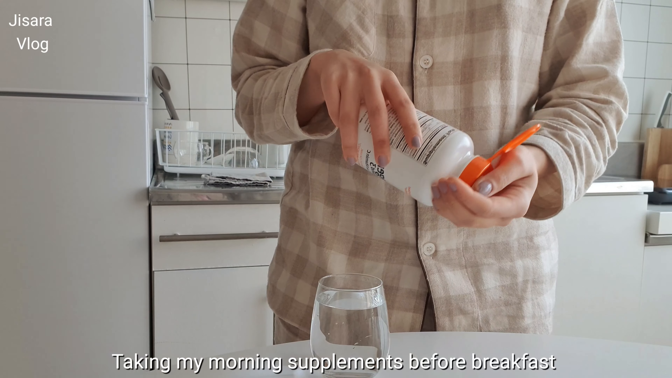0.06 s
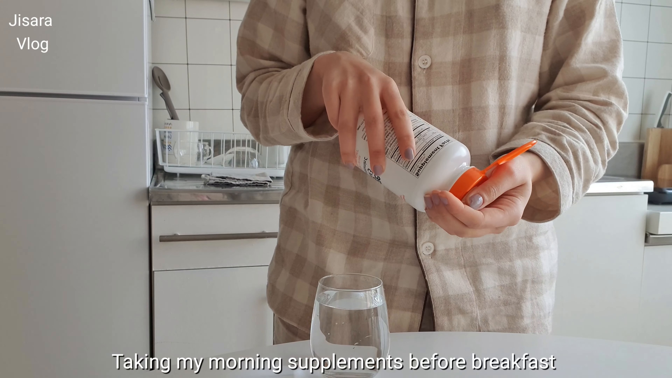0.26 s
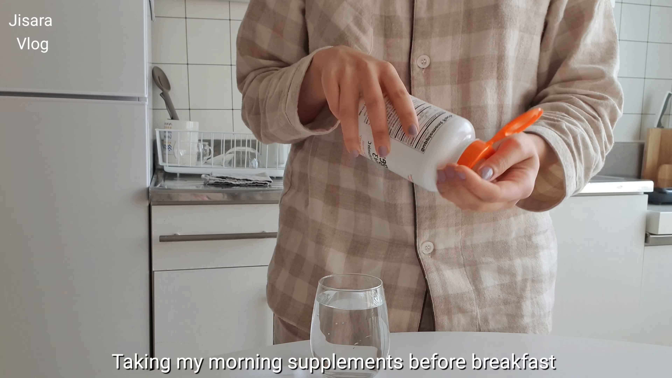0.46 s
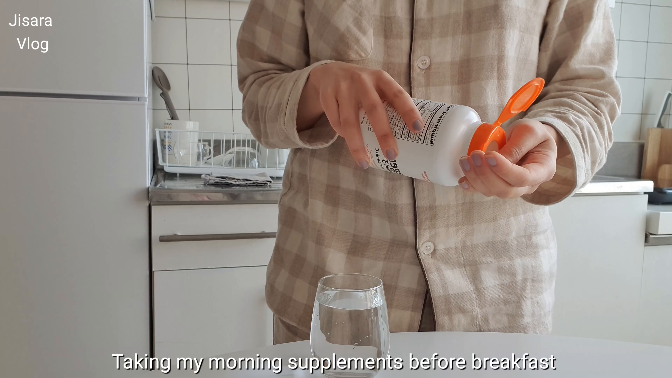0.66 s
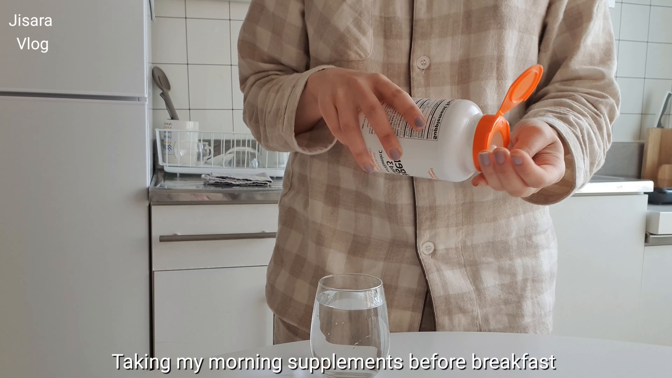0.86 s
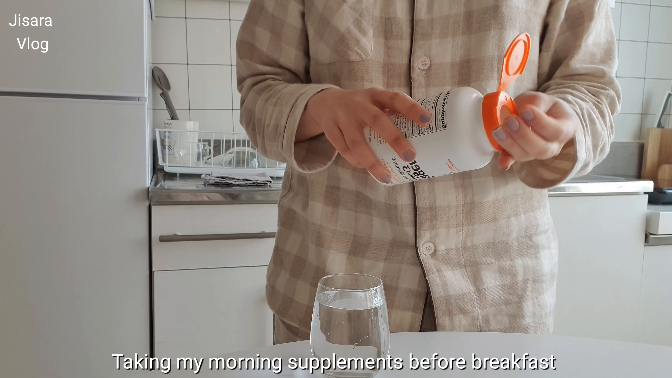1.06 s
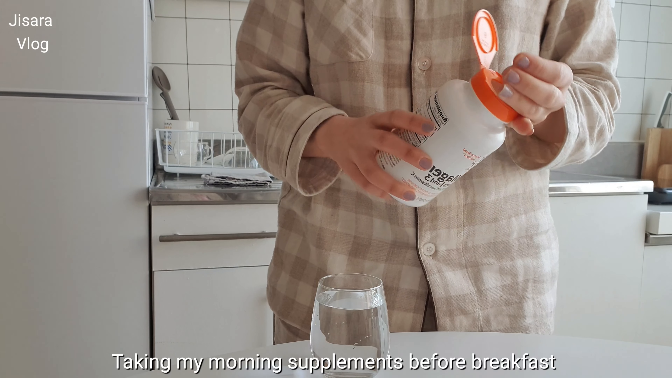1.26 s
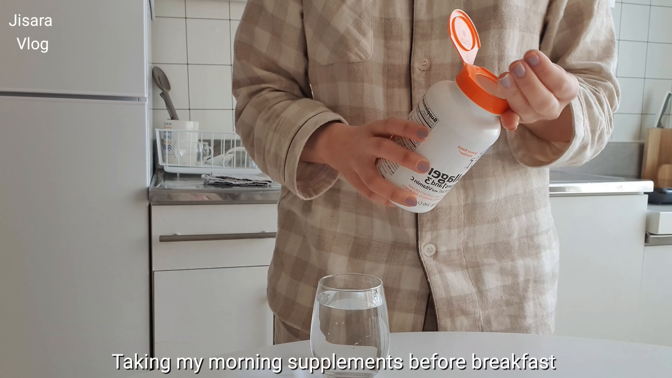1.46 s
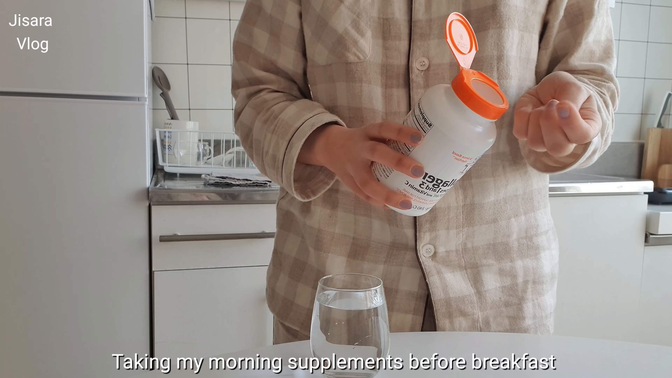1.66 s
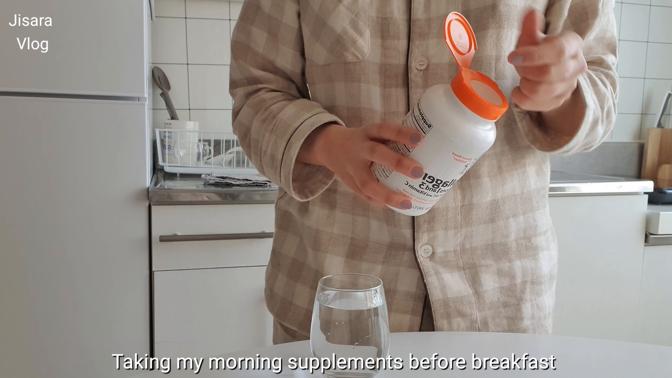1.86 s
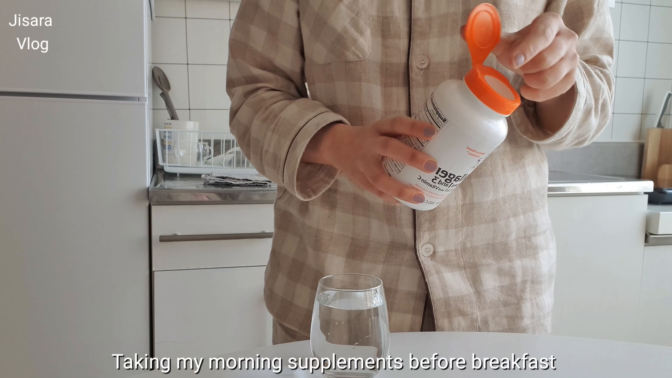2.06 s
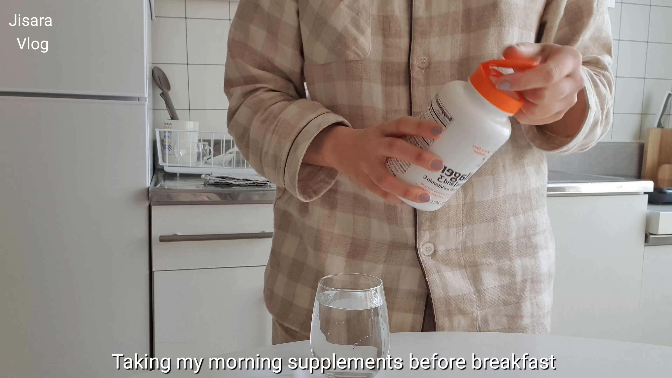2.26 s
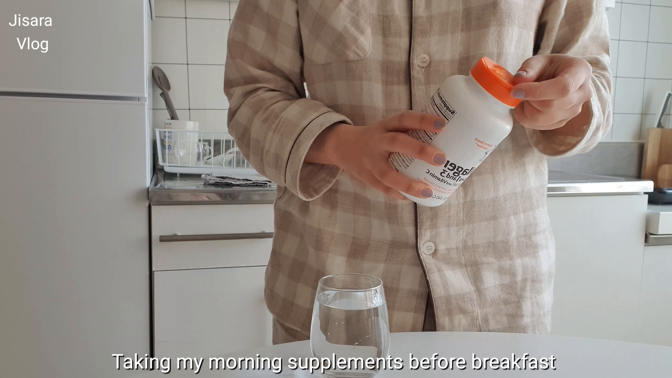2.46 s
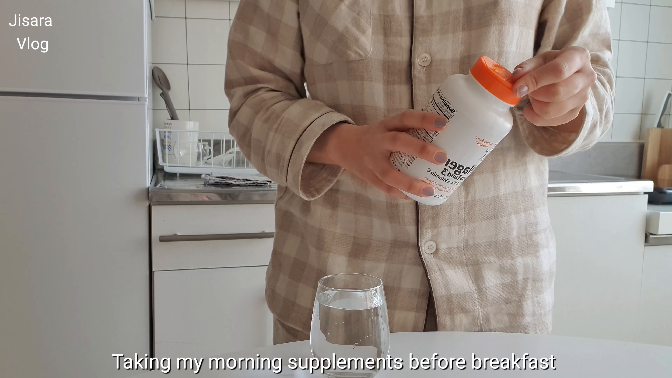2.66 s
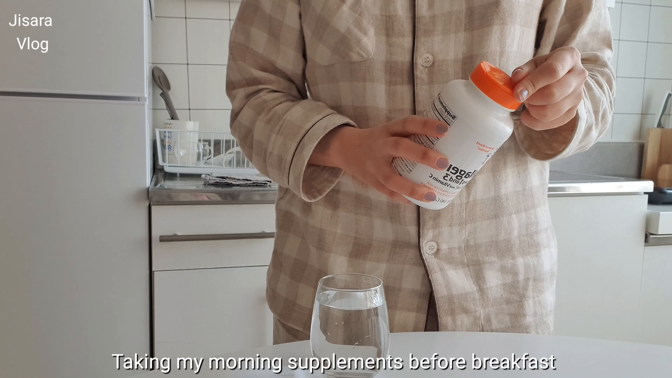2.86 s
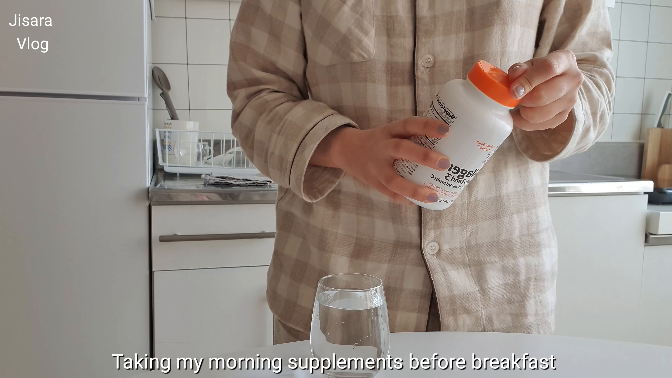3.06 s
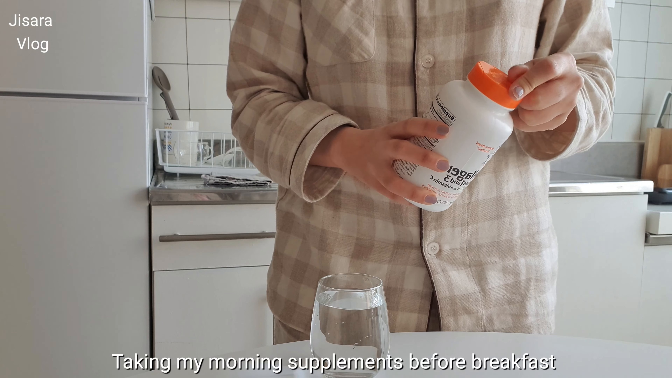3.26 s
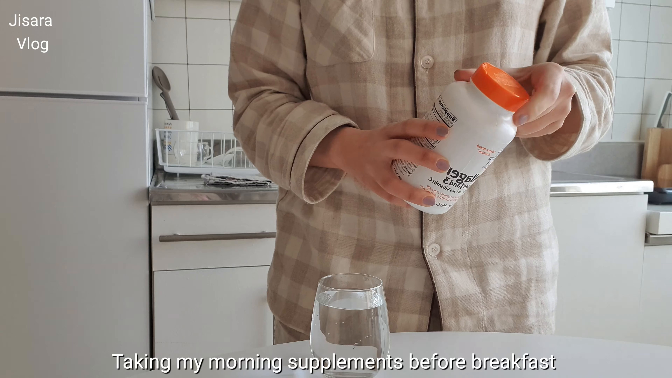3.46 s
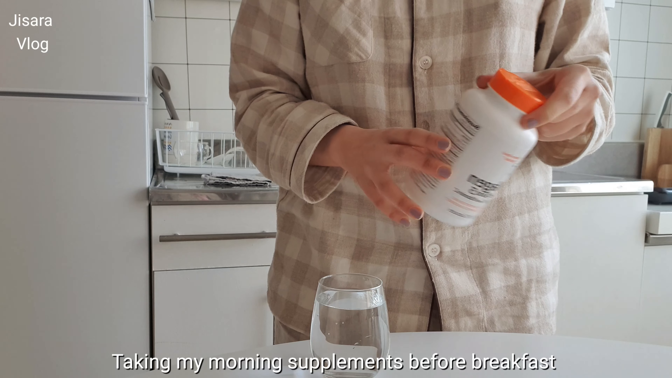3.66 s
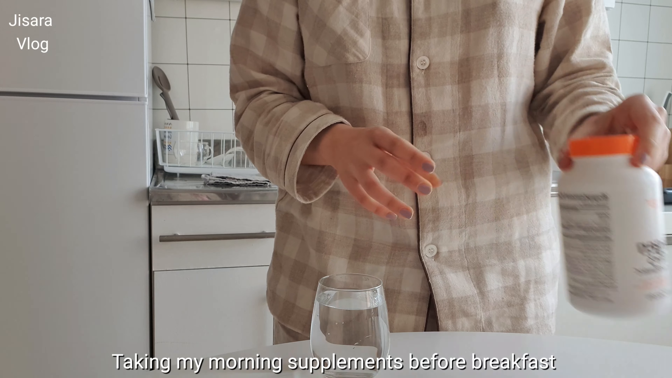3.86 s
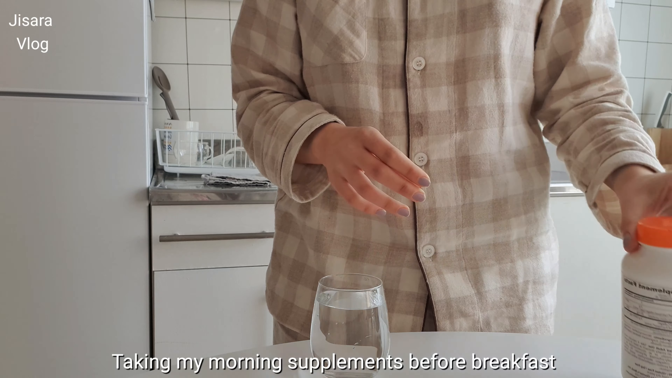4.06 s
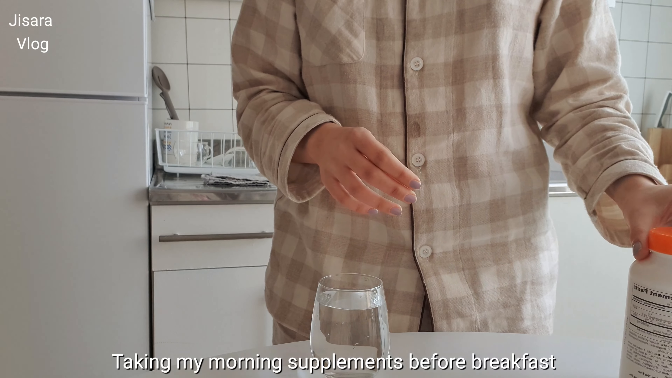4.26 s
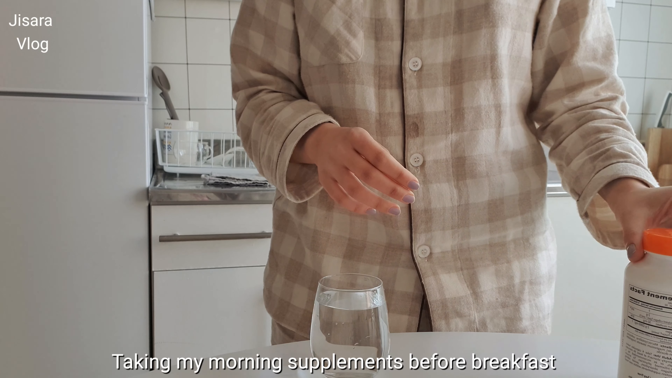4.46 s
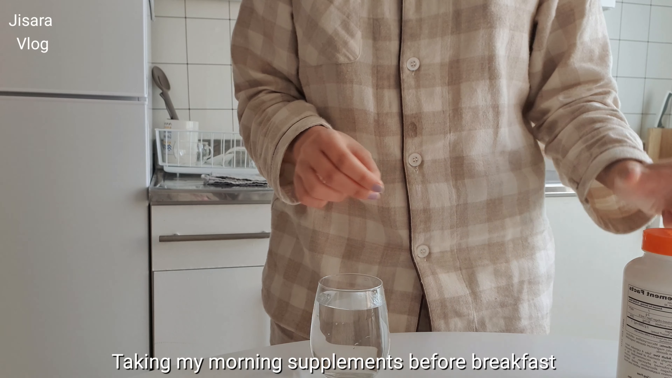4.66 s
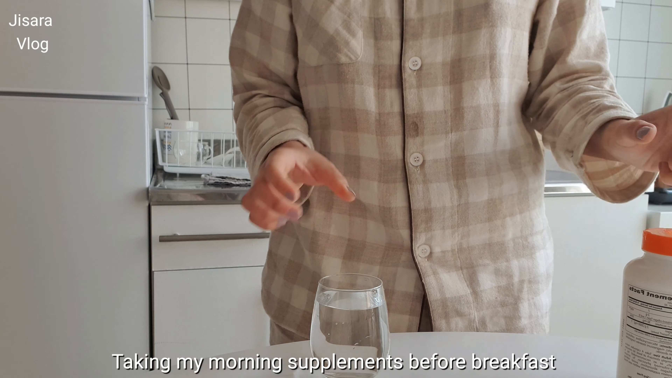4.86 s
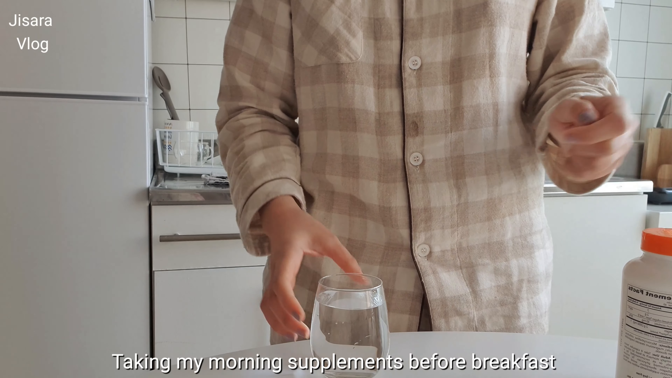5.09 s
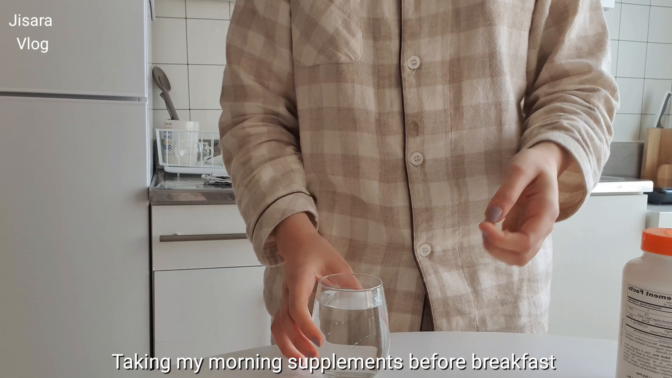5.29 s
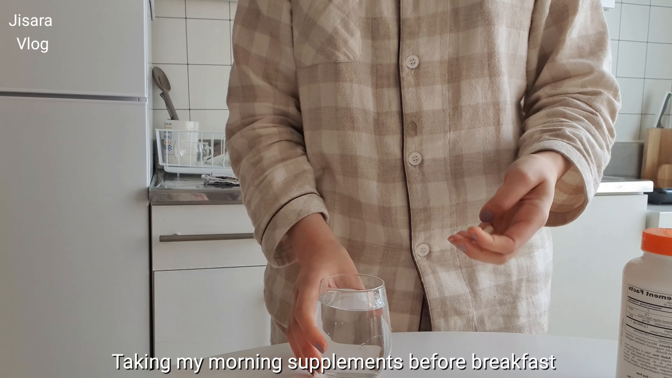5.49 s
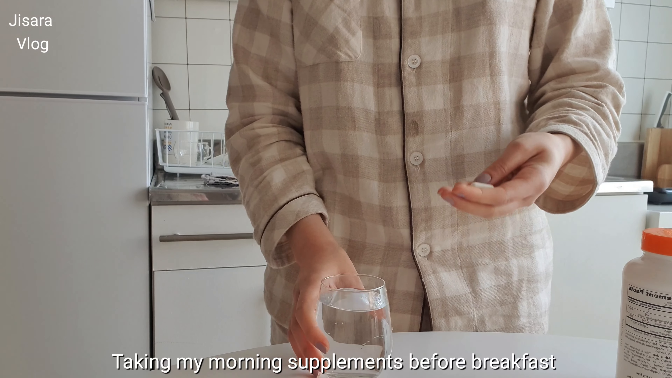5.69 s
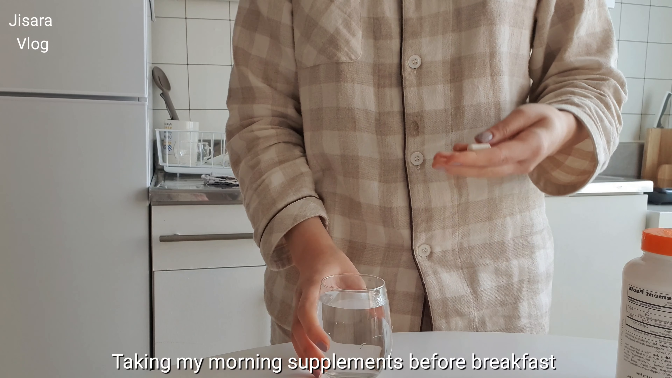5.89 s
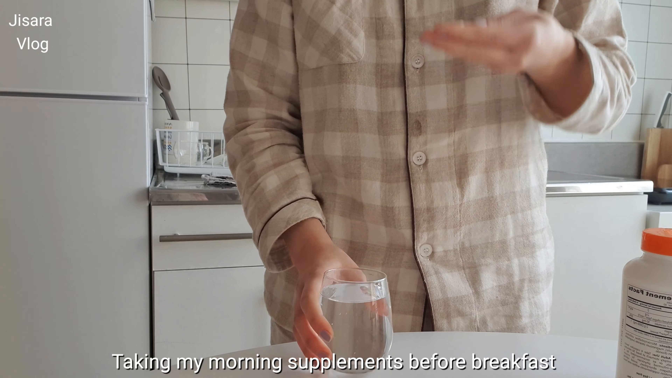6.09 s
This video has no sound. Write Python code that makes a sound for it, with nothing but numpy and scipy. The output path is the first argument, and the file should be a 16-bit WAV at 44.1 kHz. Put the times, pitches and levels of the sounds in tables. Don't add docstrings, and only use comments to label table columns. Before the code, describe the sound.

Pills rattle out of a plastic bottle in a small kitchen, the flip cap clicks and snaps hard, and the bottle lands on a table.

```python
import sys
import numpy as np
from scipy import signal
from scipy.fft import rfft, irfft
from scipy.io import wavfile

SR = 44100
rng = np.random.default_rng(int(sys.argv[2]) if len(sys.argv) > 2 else 0)


def output_pcm(signal):
    pcm = np.clip(np.atleast_2d(signal).T, -1, 1) * 32767
    wavfile.write(sys.argv[1], SR, np.round(pcm).astype(np.int16))


def invert_db(x):
    u = np.asarray(x, float) / 20
    return 10 ** u


N = 270333

# [t/s, strength level/dB, sharpness/dB (edge crack over wall ring),
# thump/dB (air cavity over strength), struck spot f/Hz]
POUR_KNOCKS = [(0.0231, -30.5, -1.5, -21, 4540), (0.0656, -34.5, -6, -4, 3550),
               (0.1344, -33, 28, -11, 3300), (0.1628, -34.5, 7, -26, 2900), (0.2061, -47, -20, 17.5, 3000),
               (0.2278, -32, -6, 10, 3060), (0.256, -31.5, -2, -25, 4400), (0.2636, -30, 18, -12, 3000),
               (0.2917, -29, 6, -5, 2480), (0.2985, -38, 3, -0.5, 2700), (0.3328, -54, 11, 22, 2700),
               (0.3686, -36, 9, -23, 2550), (0.3844, -51, -19, 12, 3000), (0.4197, -55, 13, -8, 4300),
               (0.53, -77.5, -10, 22.5, 3000)]
FALL_KNOCKS = [(1.2149, -59, 9.5, -24.5, 4640), (1.2376, -54.5, 8, -3.5, 3400),
               (1.3449, -57.5, -3.5, 14, 3000), (1.3861, -36.5, 12, -26.5, 3240),
               (1.4135, -54.5, 4, 7, 3510), (1.4557, -29, 17.5, -18, 3000),
               (1.4888, -31.5, -12.5, -8, 3010), (1.5136, -23.5, 1.3, -20, 3100),
               (1.5314, -51, 2, -19, 3030), (1.5555, -39, -16, 2.5, 2900), (1.5877, -38.5, 3, -2, 2900),
               (1.6208, -33, 2, -25, 3040), (1.6766, -43.5, 30, -4, 3600), (1.7333, -47.5, -24, -4, 3000)]
PRESS_KNOCKS = [
    (2.4225, -48, 6.5, -7.5, 2590),
    (2.4445, -49.5, 12.5, 5, 2686),
    (2.458, -55.5, 5, 19.5, 2600),
    (2.4749, -37, -17, -3, 2900),
    (2.4915, -56, -3, 19, 3400),
    (2.4972, -24, -4.5, 0.5, 3800),
    (2.5045, -34, -28, 5.2, 3800),
]
SNAP_KNOCKS = [
    (3.0876, -88, -1.5, -2.5, 2592),
    (3.1832, -39, -7, 9, 2700),
    (3.1841, -16, 3, -7, 2700),
]
CARRY_KNOCKS = [
    (3.8027, -67, 11, 7.5, 3200),
    (3.8507, -52, 9, 9, 3100),
    (3.8745, -43, -4.5, -5, 3000),
    (3.9015, -37, 18, -13, 3700),
    (3.9155, -30, -29, -19, 4300),
    (3.9579, -39.5, 29, -3.5, 3400),
    (3.9956, -43.5, 17, 7, 3700),
]
TABLE_KNOCKS = [
    (4.2936, -34.5, -1, 4.9, 3300),
    (4.325, -39.5, -8, 6.2, 2400),
    (4.5322, -61.5, -23, 3.5, 3600),
]
SETTLING_KNOCKS = [
    (.593, -51.5, -6, -18, 3500),
    (1.7575, -61.5, -7, 13, 4070),
    (4.152, -77, -4, -18, 2950),
    (4.2319, -55, -3.5, -32, 2980),
    (4.7, -66, -17, -18, 3000),
]

# [t/s, level/dB]
POUR_PATTER = [(0.0, -52.5), (0.152, -49), (0.228, -49), (0.356, -54.5), (0.412, -77.5), (0.5, -95)]
FALL_PATTER = [(1.22, -76), (1.238, -61.5), (1.33, -58), (1.42, -46), (1.47, -51.5), (1.52, -43.5),
               (1.6, -58.5), (1.72, -65), (1.8, -77)]
PRESS_PATTER = [(2.42, -67), (2.435, -54.5), (2.45, -56), (2.47, -57.5), (2.49, -61.5)]
CARRY_PATTER = [(3.8, -87), (3.844, -59.5), (3.886, -48.5), (3.914, -39), (3.93, -47.5), (4.002, -59.5),
                (4.04, -66)]
FINGER_RUB = [(3.6, -87), (3.616, -77), (3.652, -87), (3.674, -75), (3.73, -85)]
# [t/s, level/dB]
FINGER_TICKS = [
    (1.415, -56),
    (1.838, -70),
    (3.606, -70),
    (3.6194, -65),
    (4.5326, -59.5),
]

# [wall/dB, cavity/dB, crack/dB, tick/dB]
POUR_COLOUR = (3, -2, -11.5, -24.5)
FALL_COLOUR = (-2.9, -1, -11, -21)
PRESS_COLOUR = (4, 11.5, -6, -10.5)
CARRY_COLOUR = (-0.4, -11, -11.5, -24.5)
RUB_COLOUR = (-9.5, -16, -16, -1.5)

# [f/Hz, bandwidth/Hz, level/dB]
BOTTLE_TIPPED = [(272, 26, -14.5), (304.8, 6.1, -11.5), (432, 320, -4), (1058, 107, -1.5), (1350, 650, -5),
                 (1530, 134, -7), (1773, 81, -13.5), (2400, 260, -5), (2900, 205, -5.5), (4320, 1220, 5),
                 (6300, 1300, -1), (8800, 2800, 11.5), (12600, 2300, -5)]
BOTTLE_OPEN = [(340, 22, -8.5), (357, 65, -5), (540, 110, -7.5), (1144, 99, -1), (1491, 60, -4.5),
               (1769, 90, -4.5), (900, 470, -7.5), (2926, 395, -3), (3670, 710, -8.5), (4600, 734, -3),
               (5450, 4000, -6), (9250, 2000, 6.5), (12500, 3000, -8)]
CAP_LOOSE = [(141, 39, -12), (344, 33, 0), (1200, 240, -22), (1620, 120, -1), (1860, 330, -9.5),
             (2590, 560, 2.5), (3600, 1100, -2.5), (5900, 860, -2.5), (8960, 1800, 8), (12400, 3500, -0.5)]
CAP_SHUT = [(109, 95, -14), (187, 230, -9.5), (342, 240, 6.5), (524.5, 150, 2.5), (706, 120, -9),
            (1137, 225, -2.5), (1631, 330, 1.5), (2732, 380, -2), (3800, 790, -4), (5070, 890, 6),
            (6760, 1400, 11.5), (9380, 2200, 13.5), (12800, 4800, -2.5), (15500, 1700, -6.5)]
BOTTLE_SHUT = [(365, 180, -9.5), (580, 280, -1), (1170, 206, 3), (1640, 300, -2), (2900, 200, 0.5),
               (3640, 270, -2.5), (4380, 460, 2), (5700, 2300, -2), (8930, 1200, 6), (10600, 5400, -9)]
TABLE_MODES = [(97.7, 10.4, 2.5), (174.5, 16, 0.5), (250, 46, 2), (291.5, 37, -1), (455, 27.4, -4.5),
               (570, 54, -15), (632, 49, -8), (854, 180, 2.5), (1360, 740, 8.5), (2400, 760, 12.5),
               (3300, 400, 0), (5250, 2800, 6.5), (9500, 2600, 8)]
FAR_WALL = [(373, 24.5, -6.5), (1090, 136, -3), (1520, 430, -13), (2700, 150, -2.5), (3000, 280, -4),
            (4300, 970, 2), (6300, 1200, 7), (9100, 1900, 8.5)]
FAMILY_EDGES_HZ = (750, 2150, 7000)
# [wall/dB, cavity/dB, crack/dB, tick/dB]
KNOCK_GAIN_DB = (-2.5, 0.69, -1.8, -0.3)
PATTER_GAIN_DB = (-7.5, -4, -1.5, -6.5)

# [f/Hz, T60/s]
ROOM_T60 = [(80, 0.38), (160, 0.35), (400, 0.36), (1000, 0.48), (2500, 0.38), (5000, 0.39), (9000, 0.31),
            (14000, 0.25)]
# [f/Hz, level/dB]
ROOM_LEVEL = [(45, -44.5), (90, -33.5), (250, -29), (1000, -27.5), (3000, -31), (8000, -34), (14000, -30)]
# [delay t/s, level/dB]
ECHOES = [(.0072, -15), (0.019, -17.5), (0.0248, -20), (.027, -23)]
# [f/Hz, likeness/1]
ROOM_LIKENESS = [(60, 1), (180, 0.96), (550, 0.76), (1650, 0.041), (4970, 0.1), (15000, 0.25)]
# [f/Hz, level/dB per Hz]
AIR_SPECTRUM = [(12, -50), (20, -19.5), (27, -15.5), (43, -11.5), (63, -5), (86, -9.5), (156, -18.5),
                (185, -27), (266, -25), (298, -30.5), (1000, -39), (3550, -44.5), (6590, -52.5),
                (13700, -51), (16700, -58.5)]
# [f/Hz, likeness/1]
AIR_LIKENESS = [(60, 0.61), (180, 0.74), (550, 0.26), (1650, -0.8), (4970, -0.02), (15000, -0.62)]
# [f/Hz, rms level/dB]
HUM_LINES = [
    (30.25, -80.5),
    (48.35, -78),
    (60.5, -68),
]
# [start t/s, end t/s]
DROPOUT_S = (4.8058, 4.8194)

PATTER_PER_S = 1800
CRACK_FOCUS_DB = 13
CONTACT_WIDTH_HZ = 1100
CHATTER_S, CHATTER_LOSS_DB = .0006, 7.5
ECHO_CUT_HZ, CUTOFF_HZ = 4500, 17000
AIR_DB = -67.5
BEAT_PER_S, BEAT_PEAK_S = 1.75, .474
SECOND_MOTOR_DB = -4
HUM_HZ, HUM_WIDTH_HZ, HUM_NOISE_DB = 60.17, 3, -75.5


def pour_out():
    hits = knocks(POUR_KNOCKS, BOTTLE_TIPPED, scatter_db=2.5, tick_db=-15.5)
    return hits + patter(POUR_PATTER, BOTTLE_TIPPED, POUR_COLOUR, spread_db=3.0)


def fall_back():
    hits = knocks(FALL_KNOCKS, BOTTLE_OPEN, scatter_db=-2.5, tick_db=-19)
    return hits + patter(FALL_PATTER, BOTTLE_OPEN, FALL_COLOUR, spread_db=4.5)


def press_cap():
    clicks = knocks(PRESS_KNOCKS, CAP_LOOSE, scatter_db=0.0, tick_db=-8.5)
    return clicks + patter(PRESS_PATTER, CAP_LOOSE, PRESS_COLOUR, spread_db=1.0)


def snap_cap():
    return knocks(SNAP_KNOCKS, CAP_SHUT, scatter_db=1.92, tick_db=-17.5)


def carry_aside():
    hits = knocks(CARRY_KNOCKS, BOTTLE_SHUT, scatter_db=-1.5, tick_db=-10.5)
    slide = patter(CARRY_PATTER, BOTTLE_SHUT, CARRY_COLOUR, spread_db=0.4)
    rub = patter(FINGER_RUB, BOTTLE_SHUT, RUB_COLOUR, spread_db=1.5)
    return hits + slide + rub


def set_down():
    return knocks(TABLE_KNOCKS, TABLE_MODES, scatter_db=-1.7, tick_db=-11)


def settle():
    return knocks(SETTLING_KNOCKS, FAR_WALL, scatter_db=-3, tick_db=-9.5)


def finger_ticks():
    s, db = np.transpose(FINGER_TICKS)
    clicks = np.zeros(N)
    clicks[np.round(s * SR).astype(int)] = invert_db(db + 8.5)
    return strike(clicks, hz=9400, width_hz=1600)


def knocks(rows, modes, scatter_db, tick_db):
    s, strength, sharp, thump, spot = np.transpose(rows)
    wall = strength - np.maximum(sharp, 0)
    crack = strength + np.minimum(sharp, 0)
    levels = [wall, strength + thump, crack, crack + tick_db]
    luck = rng.standard_normal((len(s), len(modes)))
    gaps = CHATTER_S * rng.uniform(.5, 1.5, (len(s), 4)) * [0, 1, 1, 1]
    at = np.round((s[:, None] + np.cumsum(gaps, axis=1)) * SR).astype(int)
    out = np.zeros(N)
    for k, (hz, width_hz, level_db) in enumerate(modes):
        kind = family(hz)
        off_spot_db = CRACK_FOCUS_DB * np.log2(hz / spot) ** 2 * (kind == 2)
        mode_db = levels[kind] + KNOCK_GAIN_DB[kind] + level_db
        size = invert_db(mode_db + scatter_db * luck[:, k] - off_spot_db)
        clicks = np.zeros(N)
        for touch in range(4 if kind > 1 else 1):
            clicks[at[:, touch]] += size * invert_db(-CHATTER_LOSS_DB * touch)
        out += (-1) ** k * strike(clicks, hz, width_hz)
    return out


def patter(rows, modes, colour_db, spread_db):
    s, busy_db = np.transpose(rows)
    first, size = round(s[0] * SR), round((s[-1] - s[0]) * SR)
    tail = SR // 5
    happens = rng.random(size) < PATTER_PER_S / SR
    touches = happens * invert_db(spread_db * np.minimum(rng.exponential(1, size), 4))
    t = s[0] + np.arange(size) / SR
    busy_now_db = np.interp(t, s, busy_db)
    out = np.zeros(size + tail)
    for hz, width_hz, level_db in modes:
        kind = family(hz)
        clicks = rms_one(touches * rng.standard_normal(size)) * invert_db(busy_now_db + colour_db[kind])
        power_per_click = SR / (4 * np.pi * width_hz)
        gain = invert_db(level_db + PATTER_GAIN_DB[kind]) / np.sqrt(power_per_click)
        out += gain * strike(np.pad(clicks, (0, tail)), hz, width_hz)
    return np.pad(out, (first, N))[:N]


def strike(clicks, hz, width_hz):
    swell_hz = CONTACT_WIDTH_HZ + 2 * width_hz
    contact = ring(clicks, hz, swell_hz) * 2 * np.pi * swell_hz / SR
    return ring(contact, hz, width_hz)


def ring(clicks, hz, width_hz):
    r = np.exp(-np.pi * width_hz / SR)
    w = 2 * np.pi * hz / SR
    return signal.lfilter([0, np.sin(w)], [1, -2 * r * np.cos(w), r * r], clicks + 1e-18)


def family(hz):
    return [1, 0, 2, 3][np.searchsorted(FAMILY_EDGES_HZ, hz)]


def rms_one(x):
    return x / np.sqrt(np.mean(x ** 2) + 1e-20)


def placed(x, pan_db, lag_samples):
    late = np.interp(np.arange(N) - lag_samples, np.arange(N), x)
    late -= 0.07 * signal.lfilter(*signal.butter(1, 3500, "high", fs=SR), late)
    return np.array([late * invert_db(pan_db / 2), x * invert_db(-pan_db / 2)])


def kitchen(x):
    size = SR
    hz, noise = pair(ROOM_LIKENESS, size)
    coloured = noise * invert_db(at_hz(ROOM_LEVEL, hz))
    t = np.arange(size) / SR
    tail = np.zeros((2, size))
    for centre in 40 * 2 ** np.arange(0, 9, .5):
        octaves_off = np.log2(np.maximum(hz, 1) / centre)
        band = np.clip(1 - np.abs(2 * octaves_off), 0, 1)
        tail += irfft(coloured * band) * invert_db(-60 * t / at_hz(ROOM_T60, centre))
    tail *= np.clip((t - .002) / 0.0039, 0, 1)
    echoes = np.zeros((2, size))
    for lag, level_db in ECHOES:
        arrivals = lag + rng.normal(0, .0002, 2)
        echoes[[0, 1], np.round(arrivals * SR).astype(int)] = invert_db(level_db)
    tail += signal.lfilter(*signal.butter(1, ECHO_CUT_HZ, fs=SR), echoes)
    return signal.fftconvolve(x[None], tail, axes=1)[:, :N]


def pair(likeness, size):
    hz = np.fft.rfftfreq(size, 1 / SR)
    mid, side = rfft(rng.standard_normal((2, size)))
    alike = np.clip(at_hz(likeness, hz), 0, 1)
    common = np.sqrt((1 + alike) / 2) * mid
    opposed = np.sqrt((1 - alike) / 2) * side * [[1], [-1]]
    return hz, common + opposed


def at_hz(points, hz):
    table_hz, values = np.array(points).T
    return np.interp(np.log(np.maximum(hz, 1)), np.log(table_hz), values)


def fridge():
    t = np.arange(N) / SR - BEAT_PEAK_S
    top_hz, top_db = HUM_LINES[-1]
    second_motor = (top_hz - BEAT_PER_S, top_db + SECOND_MOTOR_DB)
    noise = rng.standard_normal(N + SR)
    rumble = ring(ring(noise, HUM_HZ, HUM_WIDTH_HZ), HUM_HZ, HUM_WIDTH_HZ)[SR:]
    out = invert_db(HUM_NOISE_DB) * rms_one(rumble)
    for hz, db in [*HUM_LINES, second_motor]:
        out += np.sqrt(2) * invert_db(db) * np.cos(2 * np.pi * hz * t)
    return out


def air():
    hz, noise = pair(AIR_LIKENESS, N)
    return invert_db(AIR_DB) * rms_one(irfft(noise * invert_db(at_hz(AIR_SPECTRUM, hz)), N))


def scene():
    pour, fall = pour_out(), fall_back()
    press, snap = press_cap(), snap_cap()
    carry, table = carry_aside(), set_down()
    settling = settle() + finger_ticks()
    direct = placed(pour, -1.4, 1.51) + placed(fall, -1.9, 1.3)
    direct += placed(press + snap, -4.4, 2.65) + placed(carry, -3.0, 3.78)
    direct += placed(table, -1.9, 9.6) + placed(settling, -2.4, 0.96)
    into_room = invert_db(-2) * pour + invert_db(-3.0) * fall
    into_room += invert_db(-4.0) * press + invert_db(4.5) * snap
    into_room += invert_db(-7.5) * carry + invert_db(1.45) * table + invert_db(3.5) * settling
    return direct + kitchen(into_room) + air() + fridge()


def top_cut(x):
    return signal.sosfilt(signal.butter(12, 16830, fs=SR, output="sos"), x)


def record(dry):
    x = dry - .5 * signal.lfilter(*signal.iirpeak(7500, 6, fs=SR), dry)
    start, end = [round(s * SR) for s in DROPOUT_S]
    x[:, start:end] *= invert_db(-24)
    x = signal.sosfilt(signal.cheby2(14, 60, CUTOFF_HZ, fs=SR, output="sos"), x)
    return top_cut(x)


dry = scene()
out = record(dry)
output_pcm(out)
```